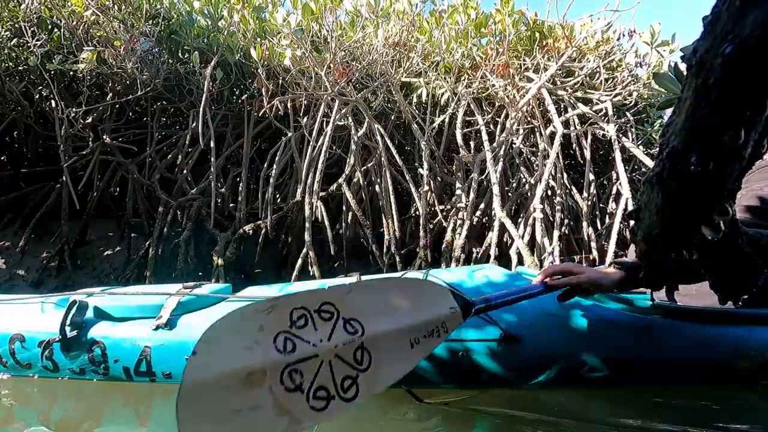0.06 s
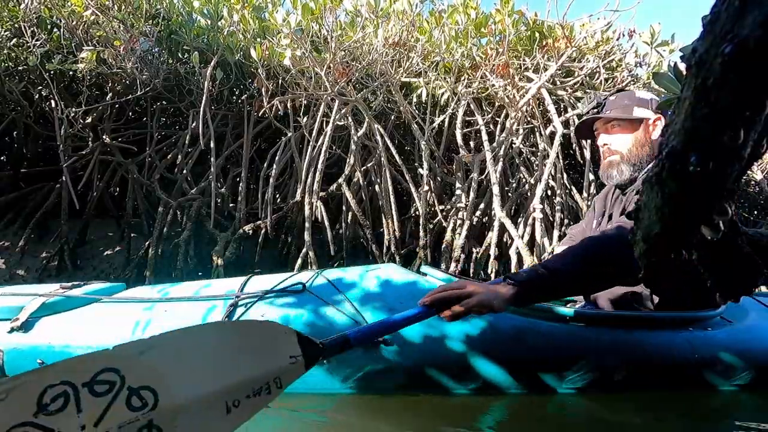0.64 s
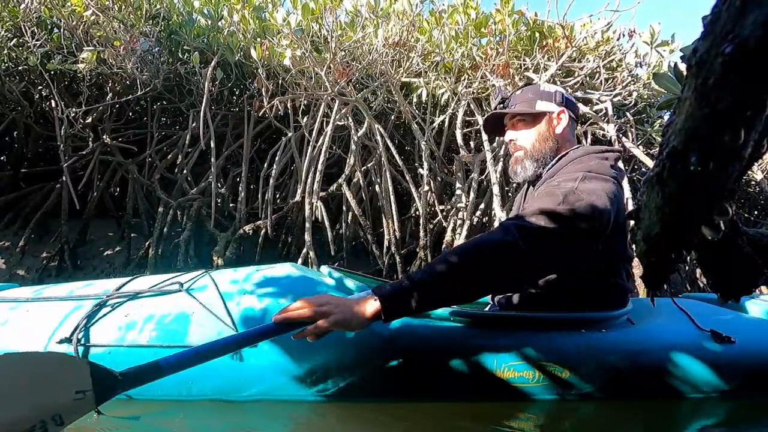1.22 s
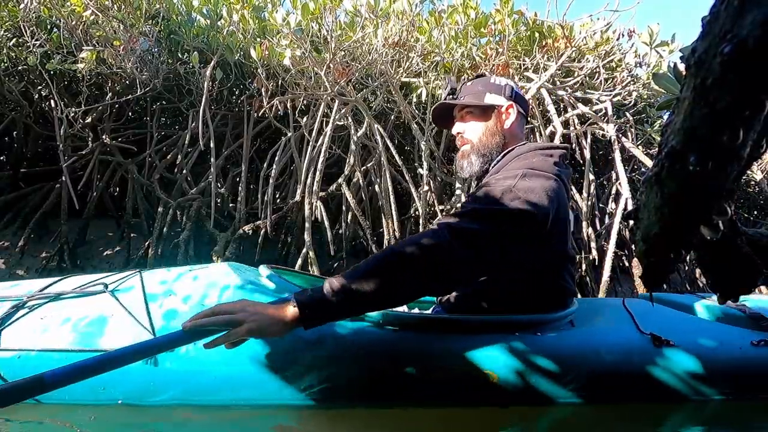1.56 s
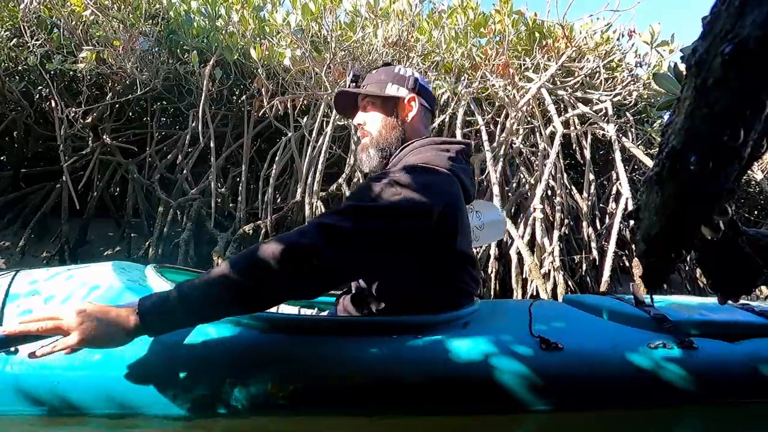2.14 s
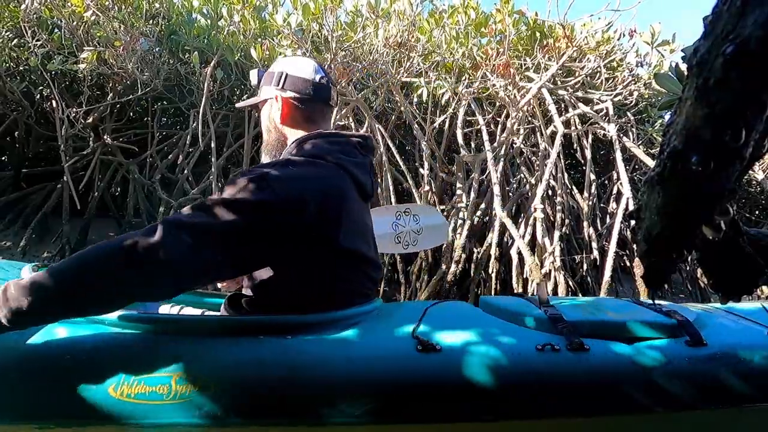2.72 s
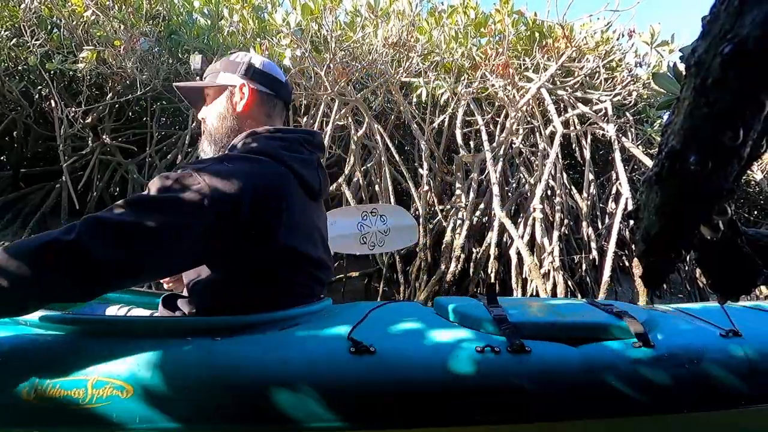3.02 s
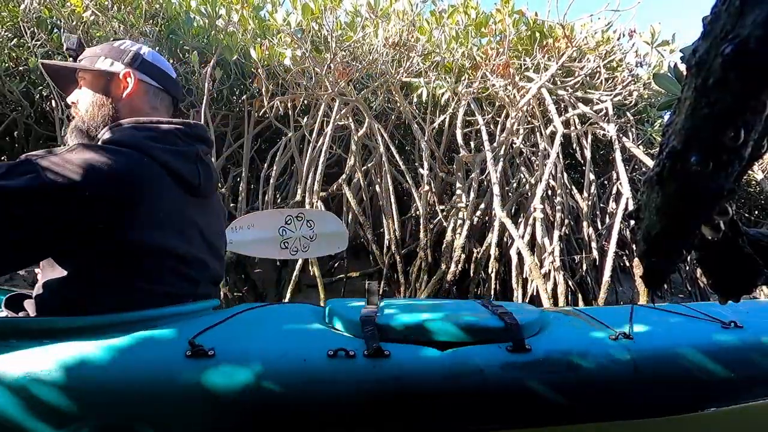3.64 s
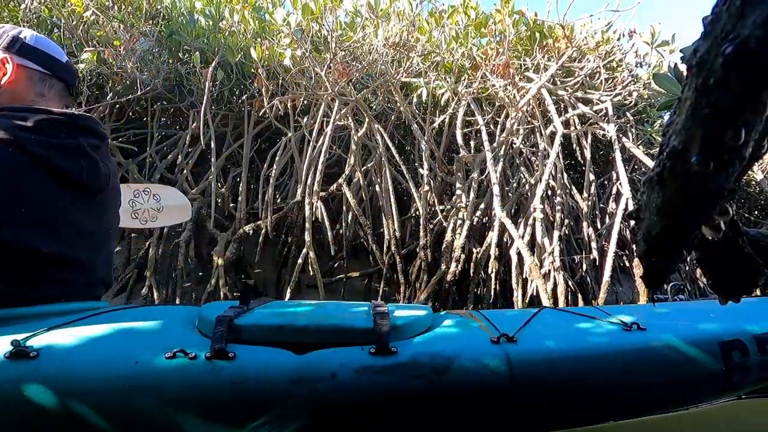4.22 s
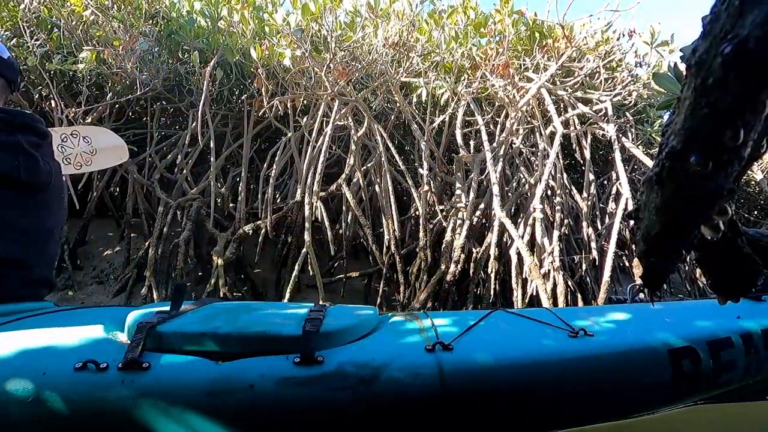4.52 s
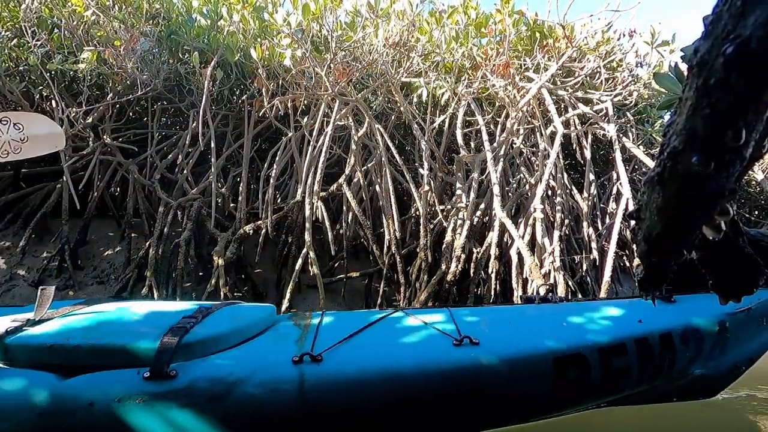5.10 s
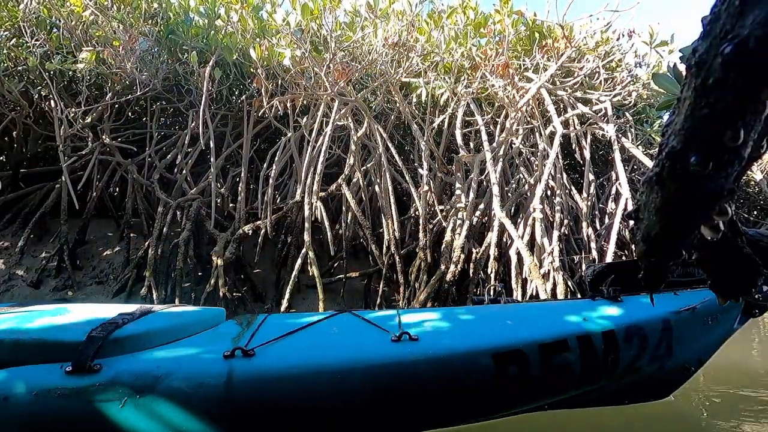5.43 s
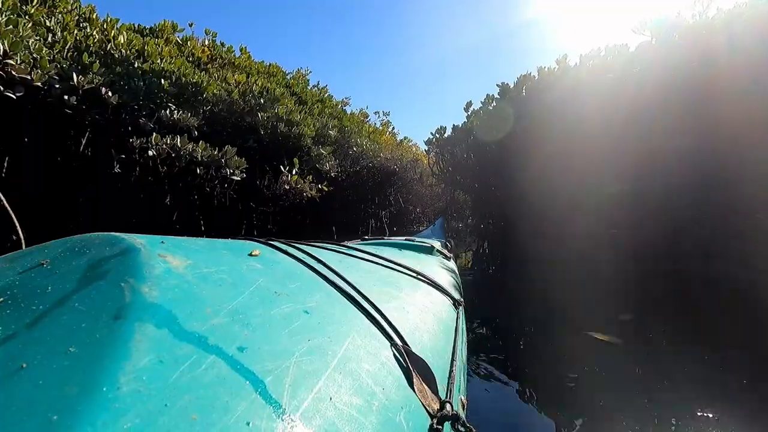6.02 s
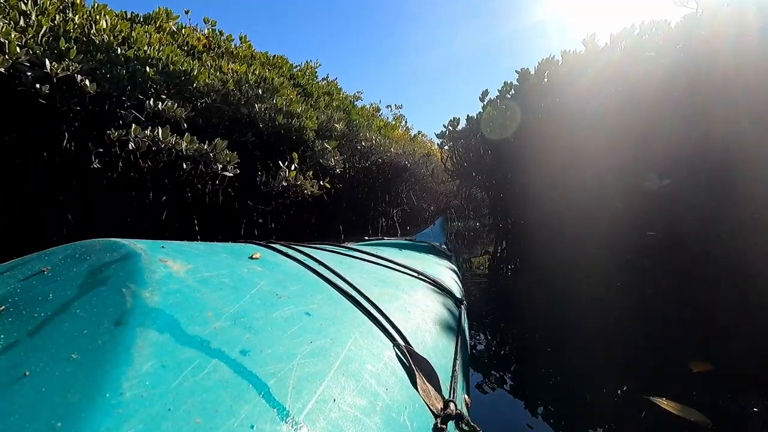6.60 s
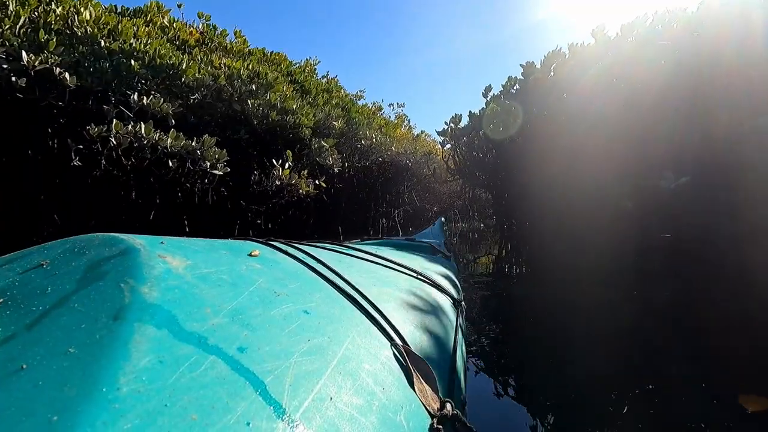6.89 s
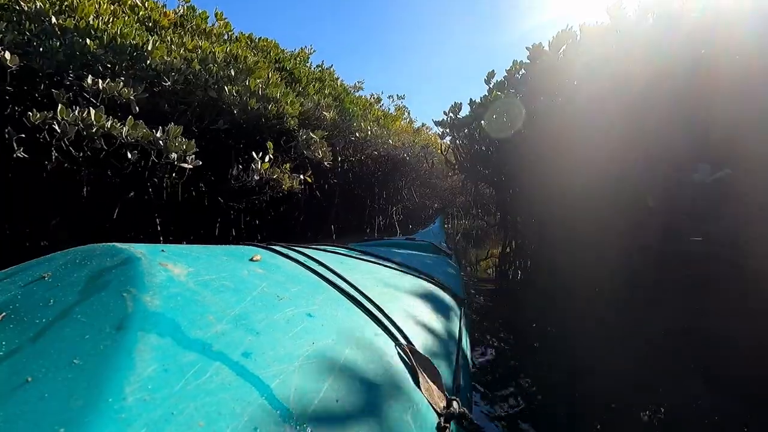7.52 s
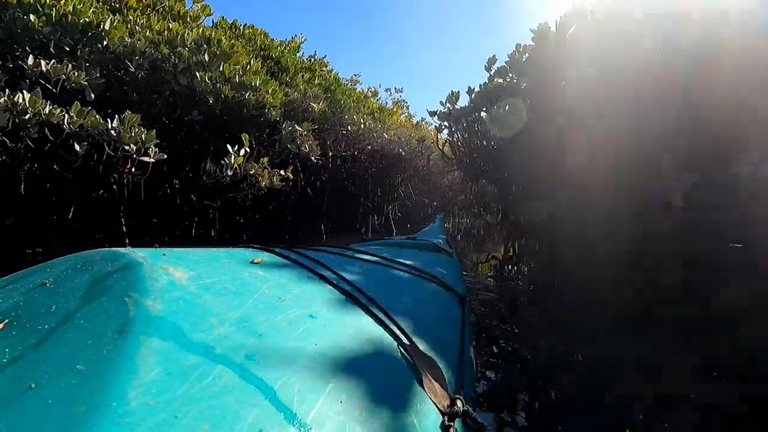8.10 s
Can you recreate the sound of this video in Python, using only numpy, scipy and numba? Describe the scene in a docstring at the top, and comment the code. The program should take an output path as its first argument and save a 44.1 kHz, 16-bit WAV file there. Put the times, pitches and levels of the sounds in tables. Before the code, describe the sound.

A kayak glides past in calm, sheltered water. The paddle knocks lightly, dips with a small splash and trails off into trickles and drips. A dull bump on the plastic hull follows, then more bubbling. Near the end a louder stroke, close on the left, sloshes twice and throws spray, and the last drops plop down. A faint, distant motor drones low underneath.

```python
"""A kayak paddles past

A plastic kayak glides by in a narrow, sheltered channel; its paddle dips, trails and drips.
Then comes one close stroke on the left: the blade gulps in, drags and throws spray beside the
hull, and the last drops fall. The water's sound is ringing air bubbles and ticking droplets.
Paddle and hull knock now and then, a sleeve swishes, and a far motor drones low underneath."""
import sys
import numpy as np
from scipy import signal
from scipy.fft import rfft, irfft, next_fast_len
from scipy.io import wavfile
from scipy.ndimage import uniform_filter1d
from numba import njit

SR = 44100
rng = np.random.default_rng(int(sys.argv[2]) if len(sys.argv) > 2 else 0)


def digitize_waveform(pressure):
    """Quantize a signal to 16-bit integers and store it at the path in sys.argv[1].

    Rows of a 2-D input are taken as channels; values are limited to [-1, 1].
    """
    field = np.atleast_2d(pressure).T
    bounded = np.clip(field, -1, 1)
    quanta = np.round(bounded * 32767).astype(np.int16)
    wavfile.write(sys.argv[1], SR, quanta)


N = 368235
T = np.arange(N) / SR
BLADE_LEAVES_S, CLOSE_FROM_S = 1.75, 5.87


def undb(db):
    """Turn decibels into a gain to multiply by."""
    return 10 ** (np.asarray(db) / 20)


def unit(x):
    """Scale a sound to an average (rms) level of 1."""
    return x / np.sqrt(np.mean(x ** 2))


def sides(pan_db):
    """Left and right gains; a positive pan_db is louder on the left."""
    gains = undb(np.array([[.5], [-.5]]) * pan_db)
    return gains / gains.mean(axis=0)


def stereo_noise(width):
    """Noise shared by both ears, plus some of each ear's own."""
    return rng.standard_normal(N) + width * rng.standard_normal((2, N))


def wander(rate):
    """A smooth random curve that takes a new value rate times a second."""
    steps = rng.standard_normal(int(N / SR * rate) + 2)
    curve = np.interp(T * rate, np.arange(len(steps)), steps)
    return unit(uniform_filter1d(curve, int(SR / rate / 2)))


def swells(rows, flatness):
    """A rounded rise and fall in loudness for each row."""
    return sum(undb(db) * .5 ** (np.abs(2 * (T - s) / length) ** flatness) for s, length, db in rows)


def colour(x, points):
    """Shape the tone through (pitch_hz, gain_db) points, keeping sudden starts sharp."""
    hz, db = np.transpose(points)
    size = next_fast_len(N + SR // 4, True) * 2
    grid_hz = np.arange(size // 2 + 1) * SR / size
    log_gain = np.log(undb(np.interp(np.log(grid_hz + 1), np.log(hz), db)))
    cepstrum = irfft(log_gain)[:size // 2]  # keep half, so nothing sounds before its cause
    response = np.exp(rfft(2 * cepstrum, size) - cepstrum[0])
    return irfft(rfft(x, size) * response)[..., :N]


@njit
def ring(start, hz, size, t60, rise):
    """Bubbles ring as tones that fade by 60 dB in t60 seconds, gliding in pitch by the share rise."""
    out = np.zeros(N)
    for k in range(len(start)):
        first, phase = int(start[k] * SR), 0.
        for i in range(max(first, 0), min(first + int(t60[k] * SR), N)):
            age = (i - first) / (t60[k] * SR)
            phase += 2 * np.pi * min(hz[k] * (1 + rise[k] * age * age), .45 * SR) / SR
            onset = 1 - np.exp(-phase / 4)  # builds up as the bubble's neck closes
            out[i] += size[k] * np.exp(-6.9 * age) * onset * np.sin(phase)
    return out


def swarm(low_hz, high_hz, rate, cycles, spread_db, apart_s, wash):
    """A crowd of bubbles, each with its own size and direction, over the hiss of rushing water."""
    when, pitch, loud, life, way, lean = rng.random((int(rate * N / SR), 6)).T
    hz = low_hz * (high_hz / low_hz) ** pitch
    size = undb(-spread_db * np.log(loud + 1 / 50)) * hz
    t60 = cycles * (.5 + life) / hz
    pair = []
    for ear in (-1, 1):
        arrival = when * N / SR + ear * (way - .5) * apart_s
        pair.append(ring(arrival, hz, size * (1 + ear * (lean - .5)), t60, way / 2))
    band = signal.butter(2, [low_hz, high_hz], "bandpass", fs=SR, output="sos")
    rush = signal.sosfilt(band, stereo_noise(.5))
    return unit(np.array(pair)) + wash * unit(rush)


# The tone of the open air: pitch_hz, gain_db
AIR_TONE = [(20, -18), (36, -14), (55, -4), (110, -5), (150, -8), (300, -16), (500, -28), (800, -38),
            (1200, -34.5), (2400, -46.5), (4000, -49), (5500, -44), (7300, -46), (10000, -54), (12200, -55),
            (15000, -74)]
# Slow puffs of air: middle_s, level_db, spread_s
AIR_PUFFS = [(0.748, -45, 0.075), (1.648, -42.5, 0.039), (2.262, -54, 0.035), (3.377, -40, 0.084),
             (4.94, -45, 0.085)]


def air(level_db=-52):
    """A distant rumble, a faint wide hiss, and puffs of air on the microphone."""
    middle = colour(rng.standard_normal(N), AIR_TONE)
    side = colour(rng.standard_normal(N), AIR_TONE)
    side = colour(side, [(60, -17), (300, -9.5), (1000, -1.5), (3000, -2)])
    distant = undb(level_db) * (middle + side * np.array([[1], [-1]])) / np.std(middle)
    puff_tone = [(10, -30.5), (25, 2.5), (40, -2), (80, -6.5), (300, -81), (2000, -110)]
    rumble = unit(colour(stereo_noise(.52), puff_tone))
    puffs = sum(undb(db) * np.exp(-((T - s) / spread) ** 2 / 2) for s, db, spread in AIR_PUFFS)
    return distant + rumble * puffs


# Swells of the far motor's drone: middle_s, length_s, peak_db
MOTOR_SWELLS = [(0.28, 0.76, -33.5), (1.08, 0.17, -42), (1.954, 0.25, -39), (2.257, 0.21, -41.5),
                (2.78, 0.088, -47.5), (3.15, 0.38, -33.5), (3.596, 0.51, -43.5), (4.29, 0.23, -38.5),
                (4.884, 0.31, -33.5), (5.612, 0.22, -38), (5.86, 0.046, -39), (6.432, 0.46, -43.5)]


def motor(drone_hz=87.5, drift_hz=.63, rest_db=-57, hum_hz=59.5, hum_db=-45, follow=.21):
    """A far motor makes two low tones: the drone swells and fades, and the hum follows a little."""
    swell = undb(rest_db) + swells(MOTOR_SWELLS, flatness=3.14)
    drift = np.interp(T, np.linspace(0, T[-1], 40), rng.standard_normal(40))
    drone = swell * np.sin(2 * np.pi * np.cumsum(drone_hz + drift_hz * drift) / SR)
    hum = undb(hum_db) * (swell / swell.mean()) ** follow * np.sin(2 * np.pi * hum_hz * T)
    return drone + hum


# A sleeve brushing on a jacket: middle_s, length_s, level_db
SLEEVE_MOVES = [(0.12, 0.57, -61.5), (3.941, 0.12, -61.5), (4.08, 0.077, -59), (4.182, 0.056, -66),
                (4.293, 0.14, -63), (4.426, 0.22, -60)]
# The tone of rubbing cloth: pitch_hz, gain_db
CLOTH_TONE = [(500, -28), (850, -7.5), (1230, 0.5), (1600, -7.5), (2500, -12.5), (4800, -13), (7500, -15.5),
              (12000, -29.5), (15000, -45)]


def sleeve(grain_db=1.25):
    """Cloth slides on cloth: a grainy hiss that swells and fades with each movement."""
    threads = stereo_noise(.81) * undb(grain_db * wander(150))
    return swells(SLEEVE_MOVES, flatness=2.2) * unit(colour(threads, CLOTH_TONE))


# The notes at which the hollow hull rings: pitch_hz, width_hz, gain_db
HULL_NOTES = [(138, 25, 25.5), (230, 63, 26.5), (284, 31, -6), (410, 33, 8), (645, 40, -31), (1040, 60, -4),
              (1270, 70, -15), (1710, 140, -32), (3770, 680, -48)]
# Dull bumps against the hull: start_s, contact_s, push_db
HULL_BUMPS = [(3.719, 0.0046, -36), (3.728, 0.0052, -37), (3.7618, 0.005, -31), (3.767, 0.0017, -39),
              (3.7768, 0.0049, -27.5)]


def hull_thumps(ring_db=-8):
    """A soft bump bends the plastic wall for a moment and briefly rings the hull."""
    push = sum(undb(db) * np.sin(np.pi * np.clip((T - s) / contact, 0, 1)) ** 2
               for s, contact, db in HULL_BUMPS)
    top_db = max(db for hz, width, db in HULL_NOTES)
    ringing = sum(undb(db - top_db) * signal.lfilter(*signal.iirpeak(hz, hz / width, SR), push)
                  for hz, width, db in HULL_NOTES)
    bend = signal.sosfilt(signal.butter(1, 60, "highpass", fs=SR, output="sos"), push)
    return -bend - undb(ring_db) * ringing


# The notes at which the stiff paddle rings: pitch_hz, width_hz, gain_db
PADDLE_NOTES = [(910, 410, -1), (1130, 140, 5), (2010, 36, -4), (3200, 230, -3.5)]
# Knocks: time_s, push_db, contact_s, hull_share (0 to 1; the rest goes to the paddle)
PADDLE_KNOCKS = [(0.392, -31, 0.002, 0.24), (0.403, -32.5, 0.0055, 0.46), (0.439, -37, 0.0088, 0.29),
                 (3.713, -50.5, 0.071, 0.76), (3.756, -38, 0.0076, 0.91), (3.768, -47, 0.0052, 0.9)]


def knocks(paddle_cutoff_hz=3000, hull_cutoff_hz=1100):
    """Brief, rough contacts ring the paddle and, with a duller push, the hull."""
    out = 0
    bodies = [(False, PADDLE_NOTES, paddle_cutoff_hz), (True, HULL_NOTES, hull_cutoff_hz)]
    for is_hull, notes, cutoff_hz in bodies:
        push = np.zeros(N)
        for s, db, contact, share in PADDLE_KNOCKS:
            fade = (T > s) * np.exp(-np.abs(T - s) / contact)
            push += (share if is_hull else 1 - share) * undb(db) * fade
        soften = signal.butter(2, cutoff_hz, fs=SR, output="sos")
        force = signal.sosfilt(soften, push * rng.standard_normal(N))
        ringing = sum(undb(db) * signal.lfilter(*signal.iirpeak(hz, hz / width, SR), force)
                      for hz, width, db in notes)
        power = sum(undb(db) ** 2 * width * np.pi / SR for hz, width, db in notes)
        out = out + ringing / np.sqrt(power)
    return np.array([out, out])


def foam(from_s=7.1, peak_s=7.52, peak_db=-53.5, last_db=-65):
    """Tiny bubbles burst in the wake, most of them soon after the close stroke."""
    pops = swarm(1200, 15000, rate=600, cycles=18, spread_db=4.2, apart_s=.00005, wash=1.1)
    fizz_tone = [(1000, 9), (3000, 4.5), (5500, 7), (8000, -.5), (12500, -10), (15500, -35)]
    fizz = unit(colour(pops, fizz_tone))
    age = T - peak_s
    burst = undb(peak_db + np.minimum(35 * age, -126 * age))  # builds, then thins, in dB a second
    last_few = undb(last_db - 3.5 * np.maximum(age, 0))
    return fizz * sides(5.8) * np.hypot(burst, last_few) * (T > from_s)


# Fine drips off the raised blade: start_s, click_db, ping_hz, ping_db
FINE_DRIPS = [(0.699, -39, 5640, -46), (0.968, -25, 6500, -56), (1.5632, -48, 3110, -61),
              (1.6135, -48, 6610, -47), (1.7733, -41, 6010, -49.5), (1.8051, -46, 6460, -57),
              (1.841, -45, 3260, -62), (1.8956, -44, 3190, -54), (1.917, -39, 7700, -43),
              (1.9637, -53, 5540, -58), (2.0959, -51, 7900, -57), (2.1234, -44, 4450, -57),
              (2.2192, -42, 6000, -61), (2.364, -59, 7400, -57), (2.4365, -46, 7140, -60),
              (2.4542, -36, 6240, -66), (2.4945, -47, 6470, -58), (2.8013, -42, 5290, -64),
              (2.9736, -48, 6430, -62), (3.2333, -42, 5410, -64), (3.446, -48, 5810, -62),
              (4.7252, -39, 6240, -61), (4.99, -52, 10900, -57)]
# The tone of a drip's click: pitch_hz, gain_db
DRIP_TONE = [(1500, -24), (3500, -4), (6500, 3), (10000, -2.5), (12500, -4), (15500, -26)]


def drips(cycles=60):
    """Each fine drip is a dry click and the ping of a pinhead bubble."""
    start, click_db, hz, ping_db = np.array(FINE_DRIPS, float).T.copy()
    hits = np.bincount((start * SR).astype(int), undb(click_db), N)[:N]
    pings = ring(start, hz, undb(ping_db), cycles / hz, 0 * hz)
    return colour(hits, DRIP_TONE) + pings


# Heavy drops that trap a bubble: start_s, pitch_hz, peak_db, time_to_surface_s, click_db
HEAVY_DROPS = [(2.425, 1100, -54, 0.027, -66), (2.474, 1125, -56.5, 0.018, -62),
               (7.721, 776, -37, .118, -30.5), (8.2462, 824, -44.5, 0.059, -32.5)]
# The tone of a heavy drop's click: pitch_hz, gain_db
HEAVY_CLICK_TONE = [(300, -24), (1000, 11.5), (2200, -4), (4000, 1), (5500, -15), (10000, -15),
                    (15000, -32)]


def bloops(ring_s=.22, rise=.62, bend=2.97):
    """A heavy drop clicks on the water; its bubble rings, then flicks up in pitch as it surfaces."""
    tone, hits = np.zeros(N), np.zeros(N)
    for s, hz, db, surface_s, click_db in HEAVY_DROPS:
        age = np.clip(T - s, 0, 2 * surface_s)
        height = age / surface_s
        phase = 2 * np.pi * np.cumsum(hz * (1 + rise * height ** bend) * (age > 0)) / SR
        intact = np.clip(5 * (1.15 - height), 0, 1)  # the tone ends as the bubble bursts
        tone += undb(db - 60 * age / ring_s) * intact * np.sin(phase)
        hits[int(s * SR)] += undb(click_db)
    click = colour(hits, HEAVY_CLICK_TONE)
    click *= hits.max() / np.abs(click).max()
    return (tone + click) * sides(np.where(T > CLOSE_FROM_S, 5, 0))


# Drops striking the water: start_s, snap_db, pitch_hz, spatter_db, pan_db
FALLING_DROPS = [(.214, -33.5, 3800, -62, -4), (.339, -30.5, 5850, -62, 1), (.69, -34.5, 8800, -60, 1),
                 (0.392, -51, 2110, -54, -3), (0.44, -39, 3340, -55, -3), (1.009, -21, 3230, -41, 3.5),
                 (1.039, -28, 3000, -44, 4), (1.057, -39, 4330, -49, 2), (1.145, -33, 2870, -57, 4),
                 (1.191, -43, 3830, -55.5, 0), (1.258, -35.5, 2720, -60, 3), (1.463, -32, 5800, -63, 0),
                 (1.643, -54, 1690, -67, -2), (1.693, -51, 2630, -58, -3), (1.3038, -32.5, 2420, -60, 6),
                 (1.3268, -28, 2840, -48.5, -1), (1.6033, -50, 2670, -54, 3), (2.067, -59, 4300, -58, 1),
                 (5.011, -46, 2900, -67, 0), (5.033, -40, 6960, -77, -2), (5.071, -59, 3000, -72, -3),
                 (5.131, -34, 5930, -54, 2), (5.182, -24.5, 2370, -43.5, -1), (5.292, -46, 5700, -52.5, 2),
                 (5.366, -53, 3550, -54.5, -2), (5.5294, -56, 2920, -57, -5), (6.339, -47, 4120, -42, 3),
                 (6.4662, -31, 3600, -34, 3), (6.8, -28, 4670, -40.5, 8), (7.059, -34, 4100, -36, 2),
                 (7.0968, -21, 3900, -31.5, 5), (7.3175, -11, 2730, -41, 6.5), (7.4296, -18, 4600, -40, 11),
                 (7.8708, -25, 8850, -59.5, 12), (8.048, -29.5, 7200, -65, 8), (8.293, -28, 2700, -46.5, 3)]


def drops(cycles=11, overtone_ratio=1.9, spatter_s=.007, scatter_s=.03):
    """Each drop snaps on the surface, then spatters and scatters finer droplets."""
    start, db, hz, spatter_db, pan_db = np.array(FALLING_DROPS, float).T.copy()
    age = np.arange(SR // 8) / SR
    burst = np.exp(-age / spatter_s) + undb(-15) * np.exp(-age / scatter_s)
    hiss_tone = [(400, -14), (1200, -4), (5000, 0), (8000, -9), (15000, -33)]
    hiss = unit(colour(stereo_noise(.5), hiss_tone))
    partials = [(1, 1), (overtone_ratio, undb(-5) * (hz < 3950))]  # only lower drops get an overtone
    out = []
    for gain, noise in zip(sides(pan_db), hiss):
        snap = sum(ring(start, hz * ratio, gain * undb(db) * size, cycles / hz, 0 * hz)
                   for ratio, size in partials)
        hits = np.bincount((start * SR).astype(int), gain * undb(spatter_db), N)[:N]
        out.append(snap + noise * signal.fftconvolve(hits, burst)[:N])
    return np.array(out)


# Surges of water round the blade: start_s, hold_s, fade_s, gurgle_db, babble_db, spray_db
BLADE_SURGES = [(0.96, 0.0092, 0.16, -47.5, -46.5, -52), (1.04, 0.053, 0.18, -54, -61.5, -51.5),
                (1.107, 0.065, 0.17, -57, -55, -58), (1.204, 0.26, 0.18, -58.5, -58.5, -66),
                (1.464, 0.0081, 0.1, -52, -47, -54.5), (1.496, 0.21, 0.17, -55, -52, -76),
                (1.769, 0.17, 0.35, -65, -62.5, -68.5), (2.05, 0.13, 0.22, -77, -76, -89),
                (2.294, 0.16, 0.59, -82, -67, -72), (5.004, 0.56, 0.75, -75.5, -65, -63.5),
                (5.817, 0.028, 0.39, -65, -65, -50.5), (5.883, 0.037, 0.21, -30, -31, -41),
                (5.918, 0.047, 0.29, -44, -36.5, -46), (5.979, 0.17, 1, -36.5, -40, -48),
                (6.266, 0.17, 0.24, -35.5, -45, -47), (6.433, 0.17, 1, -43, -38.5, -42.5),
                (6.759, 0.17, 0.23, -51, -37.5, -44), (6.872, 0.023, 0.14, -66, -24.5, -30),
                (6.895, 0.0041, 0.04, -63, -23.5, -29), (6.921, 0.098, 0.21, -58, -28.5, -32),
                (6.931, 0.0033, .06, -57, -35, -49), (7.001, 0.0085, 0.07, -58, -38, -45),
                (7.094, 0.0079, 0.13, -50, -30, -40)]


def surge_shapes(attack_s=.0031, attack_share=.066):
    """Each surge builds, holds, then falls 60 dB per fade_s; longer ones build more slowly."""
    start, hold, fade_s = np.array(BLADE_SURGES).T[:3, :, None]
    age = np.maximum(T - start, 0)
    attack = np.minimum(age / (attack_s + attack_share * hold), 1)
    fade_db = -60 * np.maximum(age - hold, 0) / fade_s
    return attack * undb(np.maximum(fade_db, -200))


# Larger single bubbles: start_s, pitch_hz, level_db, glide (positive is up, negative is down)
SINGLE_BUBBLES = [(0.388, 947, -30.5, 3.5), (.391, 697, -40, 3), (.398, 2170, -38, -2.5),
                  (.44, 1250, -38, -1.5), (.715, 3060, -42, 20), (.717, 4220, -32, 6),
                  (0.965, 1360, -34.5, 3.5), (.966, 344, -27.5, -0.5), (.969, 252.5, -29, 3),
                  (.978, 197.6, -27, 5), (1.007, 143.7, -37, 5), (1.017, 1420, -33, 5.5),
                  (1.058, 1770, -25.5, 9.5), (1.041, 3000, -26, -6), (1.061, 6600, -25, -2),
                  (1.074, 5740, -27.5, 0), (1.152, 2310, -39, -8), (1.305, 4170, -26, 8),
                  (1.356, 1710, -34, 8.5), (1.408, 1830, -44, 4), (1.4508, 2500, -43.5, -3),
                  (1.471, 1960, -36.5, -5), (1.473, 954, -28, 0.7), (1.517, 1820, -38, -2),
                  (1.529, 1000, -26.5, -2), (1.531, 1910, -39, 0), (1.485, 957, -31.5, -0.5),
                  (1.553, 1040, -33, 2), (1.485, 2960, -42, 4), (1.5587, 1600, -39, 4),
                  (1.587, 1680, -39, -1), (1.596, 1650, -36, 1), (1.6, 2920, -35, 3),
                  (1.6207, 1970, -37.5, 3.5), (1.645, 742, -34, 2.5), (1.919, 976, -47, -0.5),
                  (2.098, 1690, -50, 5), (2.23, 2010, -55.5, 4), (2.309, 2100, -53, -3),
                  (2.363, 1351, -48.5, -2.5), (2.367, 1830, -50, 4), (2.396, 1990, -50.5, -6),
                  (2.475, 2820, -45.5, 0), (2.804, 1890, -52, 6), (3.004, 2880, -60, -3),
                  (3.209, 3200, -51, 2), (5.01, 1196, -42.5, 3.5), (5.034, 1960, -42.5, -3.5),
                  (5.046, 6240, -40.5, 0), (5.133, 6000, -42, 0), (5.07, 1000, -43.5, 6.5),
                  (5.121, 1706, -38, 1), (5.181, 1970, -41, -0.5), (5.227, 1780, -36, 5.5),
                  (5.241, 1203, -33.5, 5), (5.321, 1780, -39, 2), (5.364, 1467, -42.5, 3.5),
                  (5.418, 1320, -42, 4), (5.529, 2830, -29, -5), (5.531, 3060, -31, 11),
                  (5.577, 2060, -40.5, 0.5), (5.643, 2060, -45, 1.7), (5.753, 1020, -42, 2.5),
                  (5.773, 970, -36.5, 5), (5.925, 477, -22, 1), (5.949, 967, -25, 4), (6.286, 193, -32, 2),
                  (6.371, 206, -22, -0.5), (6.584, 2820, -18, 6), (6.803, 1470, -20.5, 1.5),
                  (6.886, 810, -21, -2.5), (6.948, 810, -20.5, -1), (6.951, 625, -27, 1),
                  (6.969, 477, -32.5, 0.5), (6.982, 765, -22, -0.5), (6.986, 1036, -28, -1),
                  (7.006, 1440, -24, 2.5), (7.008, 1300, -26, -3), (7.274, 1215, -43, 1.5),
                  (7.407, 3630, -42, 4), (7.596, 6000, -42, 0), (7.637, 5250, -45, 0),
                  (7.656, 4850, -34, 9), (8.063, 1985, -50, 1), (8.316, 4800, -36, -13)]


def plinks(shapes, ring_s=.115, calm_db=-68.5, churned_db=-43, damping=.66, tick_hz=2300, tick_s=.003):
    """Single bubbles pinch off with a tick, and ring longer when large and in calm water."""
    start, hz, db, rise = np.array(SINGLE_BUBBLES, float).T.copy()
    surge_sizes = undb(np.array(BLADE_SURGES)[:, 3:]).sum(axis=1)
    stirred = surge_sizes @ shapes[:, ((start + .01) * SR).astype(int)]
    churn = np.interp(20 * np.log10(stirred + 1e-9), [calm_db, churned_db], [0, 1])
    t60 = ring_s * (1000 / np.maximum(hz, 400)) ** 1.3 * (1 - damping * churn)
    on_left = (start > CLOSE_FROM_S) & (hz > 300)
    gains = sides(np.where(on_left, 6, .8)) * undb(db)
    ripple = unit(colour(rng.standard_normal(N), [(30, 0), (120, -6), (400, -30), (2000, -60)]))
    rise = rise * np.minimum(1200 / hz, 1) ** 2  # only large bubbles float fast enough to glide much
    tick = undb(-3) * np.minimum(hz / tick_hz, tick_hz / hz) ** .5
    each = np.ones(len(hz))
    tones = np.array([ring(start, hz, gain, t60, rise) for gain in gains])
    ticks = np.array([ring(start, tick_hz * each, gain * tick, tick_s * each, 0 * each)
                      for gain in gains])
    return (1 + .1 * ripple) * (tones + ticks)


# The tones of large, middling and tiny bubbles in a crowd: pitch_hz, gain_db
GURGLE_TONE = [(90, -26), (160, 5.5), (270, -1), (480, -1), (700, -5), (1000, -36)]
BABBLE_TONE = [(450, -1.5), (730, -7), (1000, 3), (1480, -1), (1900, -6), (2500, -9), (3400, -1)]
SPRAY_TONE = [(1700, -23.5), (2700, 0.5), (3600, -2.5), (5000, -5.5), (6500, -12), (8000, -15.5),
              (10500, -19.5), (12500, -21.5), (15500, -61)]


def surging_water(shapes, chosen, gurgle, babble, spray):
    """Gurgle, babble and spray swell with each chosen surge."""
    crowds = colour(gurgle, GURGLE_TONE), colour(babble, BABBLE_TONE), colour(spray, SPRAY_TONE)
    gains = undb(np.array(BLADE_SURGES)[chosen, 3:]).T @ shapes[chosen]
    return sum(unit(crowd) * gain for crowd, gain in zip(crowds, gains))


def trickle(shapes):
    """The passing blade stirs a thin stream of bubbles, straight ahead."""
    gurgle = swarm(250, 800, rate=200, cycles=14, spread_db=2, apart_s=.0001, wash=.4)
    babble = swarm(650, 2800, rate=520, cycles=20, spread_db=2.6, apart_s=.0001, wash=.35)
    spray = swarm(2300, 15000, rate=560, cycles=28, spread_db=4.2, apart_s=.0001, wash=.3)
    passing = np.array(BLADE_SURGES)[:, 0] < CLOSE_FROM_S
    return surging_water(shapes, passing, gurgle, babble, spray)


# Pockets of air behind the close blade: start_s, length_s, from_hz, to_hz, level_db
AIR_POCKETS = [(5.887, 0.058, 220, 573, -37), (5.924, 0.051, 746, 1200, -37),
               (5.981, 0.049, 500, 771, -36.5), (6.059, 0.077, 354.7, 296, -38),
               (6.191, 0.028, 1200, 1043, -41), (6.283, 0.044, 125.1, 165, -28),
               (6.29, 0.052, 336, 852, -33.5), (6.323, 0.087, 844, 1025, -40.5),
               (6.329, 0.11, 193, 218.4, -35.5), (6.425, 0.06, 475.6, 522, -37.5),
               (6.442, 0.19, 125, 68, -44.5)]


def glugs(flutter=.5, flutter_share=.35, pan_db=5):
    """Squeezed pockets of air ring roughly and glide as they change size; higher ones lean left."""
    out = 0
    for s, length, from_hz, to_hz, db in AIR_POCKETS:
        age = np.clip((T - s) / length, 0, 1)
        phase = 2 * np.pi * np.cumsum(from_hz * (to_hz / from_hz) ** age) / SR
        rate = flutter_share * (from_hz + to_hz) / 2
        depth = flutter * min(rate / 150, 1)
        tone = (1 + depth * wander(rate)) * np.sin(phase) + depth * wander(rate) * np.cos(phase)
        arch = np.sqrt(4 * age * (1 - age))
        out = out + sides(pan_db * (to_hz > 300)) * undb(db) * arch * unit(tone)
    return out


# Flung water slapping down beside the hull: start_s, level_db, pitch_hz
WATER_SLAPS = [(5.9026, -41, 3650), (6.2792, -37.5, 3170), (6.3406, -29.5, 4400), (6.402, -45.5, 7800),
               (6.5307, -37, 3120), (6.5506, -32, 2660), (6.613, -32, 2750), (6.7338, -42, 4570),
               (6.629, -47, 7700), (6.8574, -32, 2760), (6.8812, -24.5, 2660), (6.8798, -26, 1280),
               (6.897, -26, 5170), (6.9233, -35, 4600), (6.941, -24, 3720), (7.0094, -28, 2760)]


def slaps(fade_s=.0046, width=.45, grain_db=4.5, pan_db=4):
    """Each splash lands as a very short, coarse spatter around its own pitch."""
    out, age = np.zeros((2, N)), np.arange(SR // 20) / SR
    for s, db, hz in WATER_SLAPS:
        shared, left, right, grain = rng.standard_normal((4, len(age)))
        spatter = (shared + .5 * np.array([left, right])) * undb(grain_db * grain)
        peak = signal.iirpeak(hz, 1 / width, SR)
        band = signal.lfilter(*peak, signal.lfilter(*peak, spatter))
        first = int(s * SR)
        out[:, first:first + len(age)] += undb(db) * unit(band) * np.exp(-age / fade_s)
    return out * sides(pan_db)


# How the right side is shaded from the close stroke: pitch_hz, gain_db
RIGHT_SHADE = [(120, -7.5), (220, 1), (400, -3.5), (750, -14.5), (1500, -8), (2400, -16), (4400, -1.5),
               (8000, -6.5)]


def close_stroke(shapes, echo_s=.001348, echo_gain=.2, left_lag_s=.00014, clump_db=1.4):
    """The close blade folds air under and flings spray; the hull beside it throws the sound back."""
    gurgle = swarm(110, 850, rate=600, cycles=16, spread_db=1.2, apart_s=.0002, wash=.55)
    babble = swarm(600, 2900, rate=2000, cycles=36, spread_db=1.6, apart_s=.00012, wash=.45)
    spray = swarm(2200, 15500, rate=4000, cycles=26, spread_db=2.5, apart_s=.00003, wash=.45)
    spray *= undb(clump_db * wander(140))  # the spray lands in clumps
    close = np.array(BLADE_SURGES)[:, 0] > CLOSE_FROM_S
    water = surging_water(shapes, close, gurgle, babble, spray)
    echo = np.array([np.interp(T - echo_s, T, ear) for ear in water])
    left, right = water + echo_gain * echo
    return np.array([np.interp(T - left_lag_s, T, left), colour(right, RIGHT_SHADE)])


def bank_echoes(x, fade_s, echo_db):
    """Roots on the banks and the hull scatter the sound, adding a short tail of echoes."""
    age = np.arange(SR // 2) / SR
    scatter = rng.standard_normal((2, len(age))) + rng.standard_normal(len(age))
    tail = signal.lfilter([1], [1, -.5], scatter) * undb(-60 * age / fade_s) * (age > .003)
    tail /= np.sqrt(np.sum(tail ** 2, axis=1, keepdims=True))
    return x + undb(echo_db) * signal.fftconvolve(x, tail, axes=1)[:, :N]


def scene():
    """The blade is crisp while near and blurred by echoes once it leaves; the close stroke is driest."""
    shapes = surge_shapes()
    paddling = trickle(shapes) + close_stroke(shapes) + glugs() + foam() + plinks(shapes)
    paddling = paddling + drops() + bloops() + slaps() + knocks()
    near, close = T < BLADE_LEAVES_S, T > CLOSE_FROM_S
    passing = bank_echoes(paddling * near, fade_s=.12, echo_db=-12)
    away = undb(-1.8) * bank_echoes(paddling * ~(near | close), fade_s=.1, echo_db=-3)
    beside = bank_echoes(paddling * close, fade_s=.15, echo_db=-15)
    return passing + away + beside + drips() + hull_thumps() + sleeve() + motor() + air()


def record(dry):
    """Dull the highest treble and cut off everything above 15.7 kHz."""
    dulled = colour(dry, [(12800, 0), (14000, -3), (15700, -6)])
    return signal.sosfilt(signal.ellip(8, .2, 70, 15700, fs=SR, output="sos"), dulled)


dry = scene()
out = record(dry)
digitize_waveform(out)
```